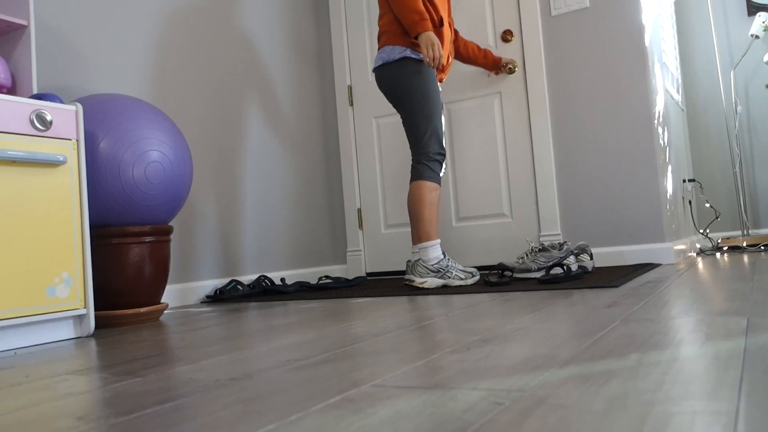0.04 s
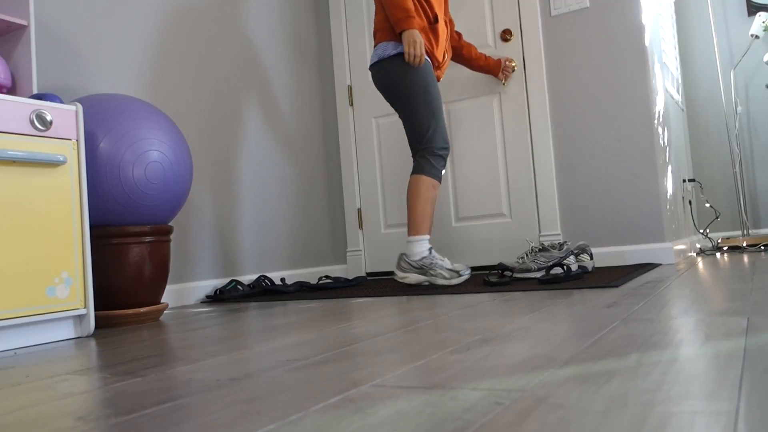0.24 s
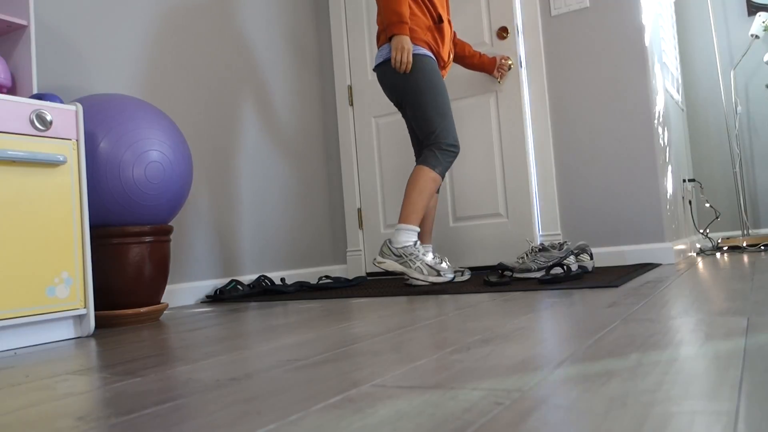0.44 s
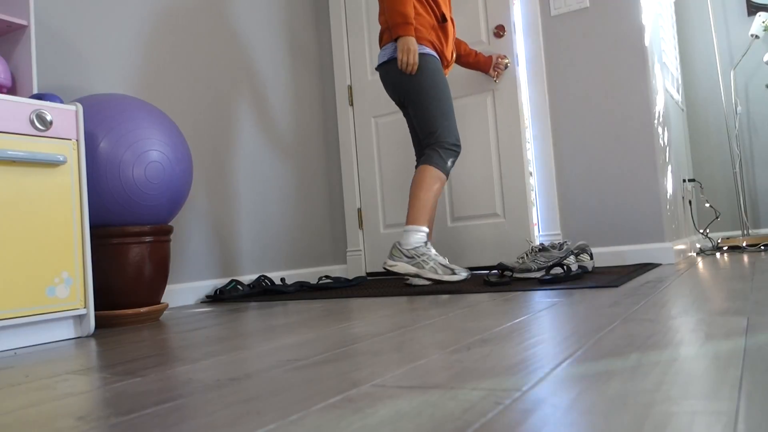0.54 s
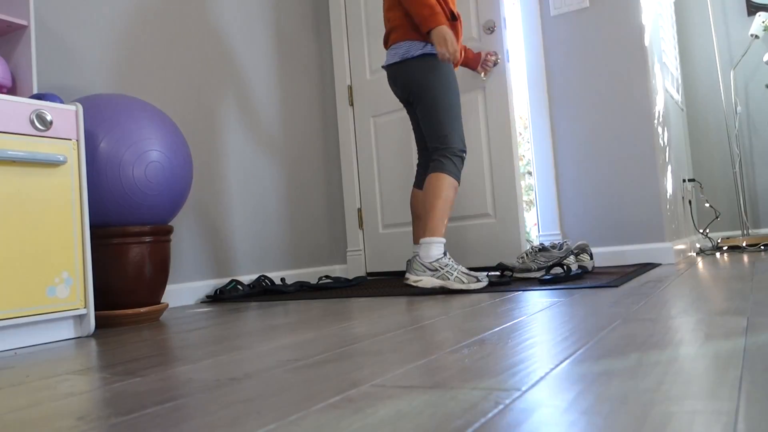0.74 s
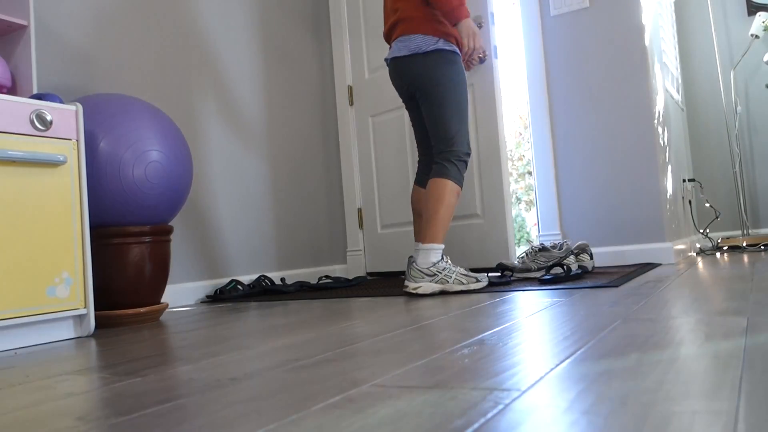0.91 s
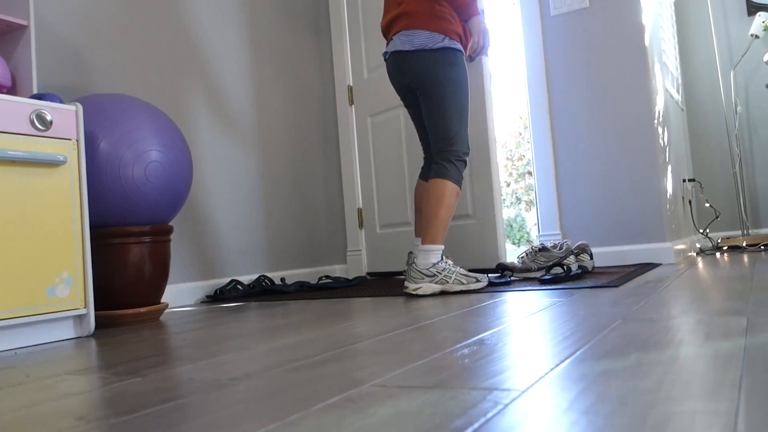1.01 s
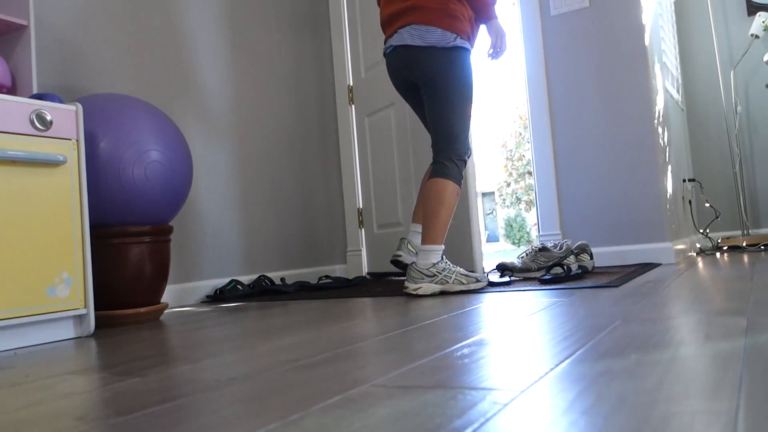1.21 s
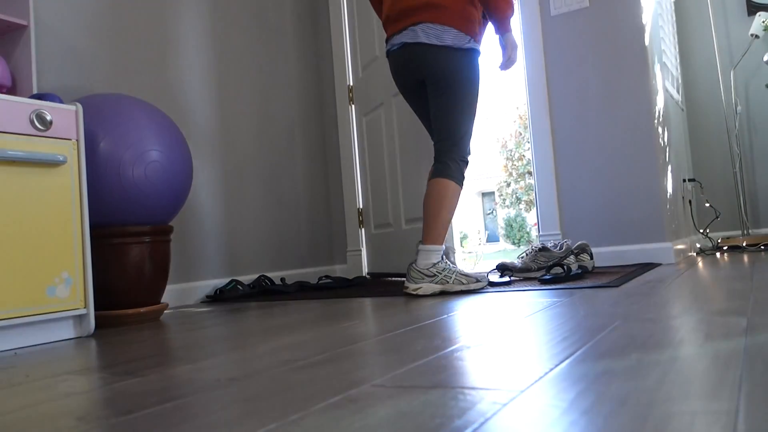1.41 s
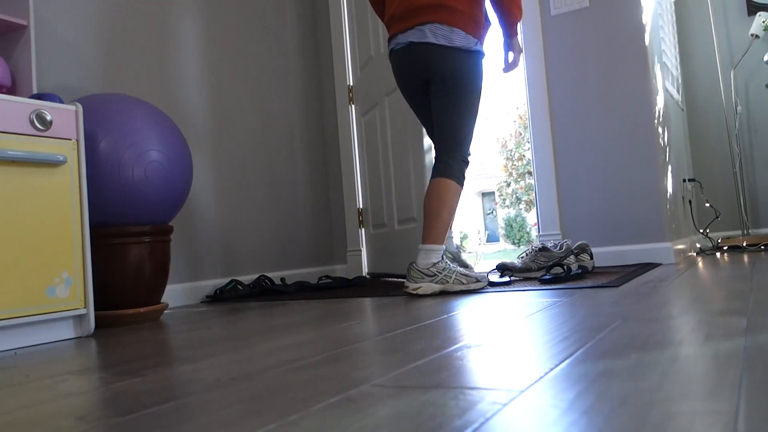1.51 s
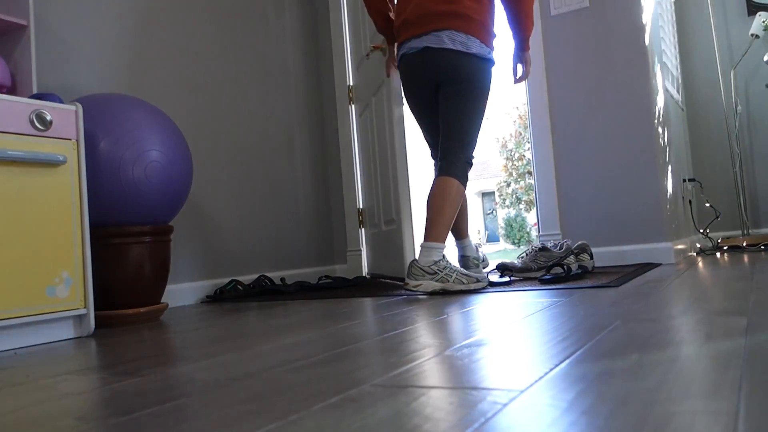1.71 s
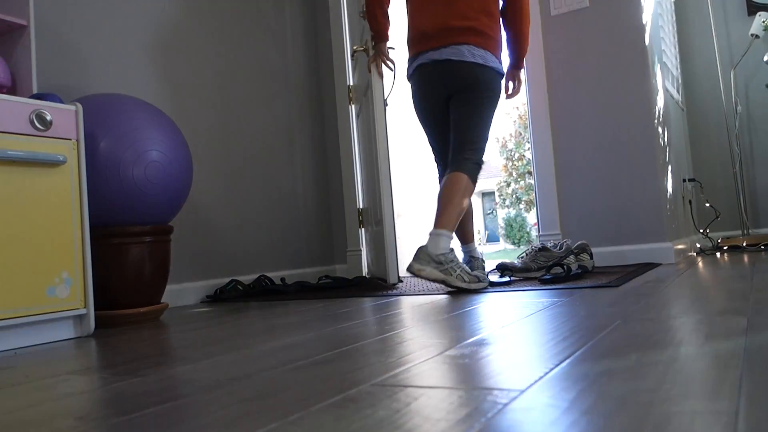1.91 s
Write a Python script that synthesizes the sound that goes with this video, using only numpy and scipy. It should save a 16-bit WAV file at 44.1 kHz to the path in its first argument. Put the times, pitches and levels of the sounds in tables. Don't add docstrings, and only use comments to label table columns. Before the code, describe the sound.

A household front door unlatches with clicks and a sharp knock, its seal peels with a brief hiss, then the hinge creaks from rattle to squeal, heard a few metres away in a bare, hard-floored room.

```python
import sys
import numpy as np
from scipy import signal
from scipy.fft import rfft, irfft
from scipy.io import wavfile
from scipy.ndimage import uniform_filter1d

SR = 44100
rng = np.random.default_rng(int(sys.argv[2]) if len(sys.argv) > 2 else 0)


def decibels_to_gain(level_db):
    exponent = np.asarray(level_db, float) / 20
    return 10 ** exponent


def unload_wav(signal):
    wavfile.write(
        sys.argv[1],
        SR,
        np.round(np.clip(np.atleast_2d(signal).T, -1, 1) * 32767).astype(np.int16),
    )


N = 85995
T = np.arange(N) / SR


def curve(rows, col, edge_s=0):
    r = np.array(rows, float)
    value = np.interp(T, r[:, 0], r[:, col])
    if not edge_s:
        return value
    inside_s = np.minimum(T - r[0, 0], r[-1, 0] - T)
    return np.clip(inside_s / edge_s + 1, 0, 1) * decibels_to_gain(value)


def over_hz(rows, hz):
    r = np.array(rows, float)
    return np.interp(np.log(hz + 1), np.log(r[:, 0]), r[:, 1])


def unit(x):
    return x / np.sqrt(np.mean(x ** 2))


def band(x, hz, width_hz):
    b, a = signal.iirpeak(min(hz, .45 * SR), hz / width_hz, fs=SR)
    return signal.lfilter(b, a, x)


def body(x, rows):
    return sum((-1) ** k * decibels_to_gain(db) * band(x, hz, width_hz) for k, (hz, width_hz, db) in enumerate(rows))


def walk(rate_hz):
    hold = int(SR / rate_hz)
    steps = np.repeat(rng.standard_normal(N // hold + 1), hold)
    return 1.26 * uniform_filter1d(uniform_filter1d(steps, hold), hold)[:N]


def pair(colour):
    # hz, left-right likeness [0-1]
    likeness = [(30, 0.7), (125, .995), (300, 0.98), (500, 0.89), (1000, 0.87), (2000, 0.5), (4000, 0.1),
                (8000, 0)]
    hz = np.arange(N // 2 + 1) * SR / N
    alike = np.clip(over_hz(likeness, hz), 0, 1)
    mid, side = rfft(rng.standard_normal((2, N))) * decibels_to_gain(over_hz(colour, hz))
    mid = mid * np.sqrt(1 + alike)
    side = side * np.sqrt(1 - alike)
    return unit(irfft(np.array([mid + side, mid - side]), N))


def stack(hz, orders, jitter, wobble_db, spread_rad=0):
    phase = 2 * np.pi * np.cumsum(hz * (1 + jitter * walk(150))) / SR
    waver = [walk(45) for _ in range(11)]
    tone = 0
    for k, gain in orders:
        level = gain * decibels_to_gain(wobble_db * waver[int(k) % 11])
        tone = tone + level * np.cos(k * phase + spread_rad * waver[int(k * 3 + 1) % 11])
    return tone * decibels_to_gain(wobble_db / 2 * walk(60.4)), phase


def air():
    # hz, db_per_hz
    air_colour = [(20, -4), (60, -29), (200, -22.5), (650, -6.5), (900, -12.5), (1700, -3), (2600, -11.5),
                  (16000, -16.5)]
    return decibels_to_gain(-63.5) * pair(air_colour) * decibels_to_gain(1.25 * walk(9.48))


def rub():
    # start_s, level_db
    rub_level = [(0, -53), (.13, -59.5), (.2, -40), (.6, -50), (.8, -41), (.9, -53), (.97, -41.5),
                 (1.03, -45), (1.13, -55), (1.17, -40), (1.35, -54.5), (1.55, -76), (1.95, -69)]
    # hz, db_per_hz
    rub_colour = [(60, -45), (150, -26.5), (300, -19), (1100, -2.5), (2200, -7.5), (4000, -13.5),
                  (7000, -23), (15000, -54.5)]
    flicker_db = 1.5
    return pair(rub_colour) * decibels_to_gain(curve(rub_level, 1) + flicker_db * walk(23.8))


def hits():
    # start_s, peak_db, bright_db, length_s
    blows = [(0.002, -45.5, -12, 0.011), (0.019, -47, -19, 0.00093), (0.143, -37.5, -28, 0.0054),
             (0.152, -40, -43, 0.0027), (0.1724, -38.5, 11, 0.0015), (0.178, -32, 8, 0.0009),
             (.187, -44, 12, 0.0011), (0.196, -41, 8, .001), (.2015, -33.5, 15, 0.0025),
             (0.221, -33.5, -6, 0.0027), (0.339, -18, -62, 0.0016), (0.3484, -25, -60, 0.0016),
             (0.350, -18, -57, 0.0026), (0.356, -30, -47, 0.00093), (0.7574, -27, -50, 0.0017),
             (.93, -32.5, -24, .02), (0.97, -27, -40, 0.007), (0.966, -36.5, -25, .02),
             (1.146, -64, 1, .005), (1.1525, -31.5, -2, 0.0096), (1.154, -41, -30, 0.0038),
             (1.156, -35.5, -28, 0.0069), (1.175, -36.5, -10.5, 0.0038), (1.216, -35, -34, 0.0035),
             (1.229, -35, -30, 0.0047), (1.243, -39, -29, 0.0025), (1.284, -41, -35, 0.0059),
             (1.34, -62, -26, 0.0032), (1.736, -57, -9, 0.0078), (1.753, -54.5, -21, 0.0047),
             (1.844, -55.5, -5, 0.027), (1.879, -56, -2, 0.0065), (1.911, -54, -11.5, 0.0067)]
    ring_hz = [870, 3760, 1100, 910, 2540, 3000, 2500, 3000, 1970, 1100, 4130, 3570, 3930, 4000, 2070, 2880,
               1800, 3300, 8630, 3610, 3000, 4080, 1200, 1176, 1305, 1100, 2416, 2000, 2060, 2300, 2040,
               1610, 2080]
    # hz, width_hz, level_db
    panel = [(169, 39, -7), (300, 91, 8.5), (600, 900, -10), (1100, 1100, -16), (1800, 390, 4)]
    out, t = np.zeros(N + 8000), np.arange(8000) / SR
    chance = rng.standard_normal((len(blows), 8000))
    for (start_s, peak_db, bright_db, length_s), hz, noise in zip(blows, ring_hz, chance):
        decay = np.exp(-t / length_s)
        push = noise * decay * (1 - np.exp(-(t / .0013) ** 2))
        crack = noise * np.exp(-t / (0.00076 + 1.5 * length_s))
        ring = push + .7 * np.sin(2 * np.pi * hz * t) * decay * (length_s < .0027)
        for _ in range(2):
            crack = band(crack, 6300, 12000)
        for _ in range(3):
            ring = band(ring, hz, hz / 4)
        panel_share = min(1300 / hz, 1) ** 4
        blow = decibels_to_gain(14.5) * ring + panel_share * body(push, panel) + decibels_to_gain(bright_db) * crack
        first = int(start_s * SR)
        out[first:first + len(t)] += decibels_to_gain(peak_db) * blow / np.abs(blow).max()
    return out[:N]


def groan():
    # start_s, pitch_hz, level_db
    groan_rows = [(.7, 291.4, -73), (.742, 300, -47.5), (.775, 325, -64), (.826, 358.4, -42),
                  (.862, 351, -57), (.902, 347.6, -43), (.95, 300, -63), (1.0, 289.7, -51),
                  (1.12, 295, -53.5), (1.15, 289, -79)]
    # centre_s, pitch_hz, level_db, length_s
    hums = [
        (0.0057, 262.8, -61.5, 0.11),
        (0.56, 215, -59.5, 0.053),
        (0.55, 2340, -36.5, .012),
        (0.9, 1188, -27.5, 0.011),
        (0.89, 2470, -38, 0.026),
        (1.03, 3500, -44.5, .03),
        (1.3, 1600, -37, .014),
        (0.79, 1500, -48, .04),
        (1.113, 590, -50, .026),
    ]
    orders = [(1, 0.8), (2, decibels_to_gain(-18.5))]
    tone = stack(curve(groan_rows, 1), orders, jitter=0.0034, wobble_db=1.0)[0]
    out = decibels_to_gain(3.5) * tone * curve(groan_rows, 2, edge_s=0.037)
    for centre_s, hz, db, length_s in hums:
        out = out + decibels_to_gain(db) * np.cos(2 * np.pi * hz * T) * np.exp(-((T - centre_s) / length_s) ** 2)
    return out


def seal():
    # start_s, centre_hz, level_db
    peel = [(.18, 3300, -66), (.215, 3720, -41.5), (.25, 4170, -37), (.28, 4300, -36.5), (.305, 4324, -34),
            (.322, 4300, -34.5), (.332, 4100, -37), (.345, 4020, -38)]
    # hz, width_hz, level_db
    seal_body = [(1100, 540, -10), (1800, 5100, -54), (236, 280, -20), (3000, 950, -7), (8700, 6500, -28.5)]
    crackle = rng.standard_normal(N) * decibels_to_gain(2.6 * rng.exponential(size=N)) * decibels_to_gain(0.9 * walk(123))
    slow = signal.lfilter(*signal.butter(2, 400 / SR * 2), crackle)
    ring = 2 * slow * np.cos(2 * np.pi * np.cumsum(curve(peel, 1)) / SR)
    hiss = unit(ring + decibels_to_gain(-3) * body(crackle, seal_body))
    return decibels_to_gain(0.5) * hiss * curve(peel, 2, edge_s=0.0042)


def hinge():
    # start_s, slip_hz, level_db, top of slip spectrum [octaves over 1 kHz], pure_lowest_tone_db
    slip_rows = [(.36, 237, -33, 3.9, -80), (.385, 274.8, -29, 3.57, -77), (.42, 335, -29, 3.3, -62.5),
                 (.506, 421.2, -31.5, 3.12, -52), (.582, 511.4, -30.5, 2.23, -49.5),
                 (.62, 622.5, -35, 2.43, -48.5), (.67, 883.3, -33, 2.23, -37), (.7, 1010, -38, 2.9, -49),
                 (.735, 1146, -33.5, 2.24, -36), (.78, 1211, -36, 2.5, -42.5), (.852, 1199, -38, 2.52, -38),
                 (.89, 1096, -33, 1.7, -54), (.925, 992.3, -35.5, 1.38, -46.5),
                 (.965, 877.7, -37, 1, -35.5), (1.03, 859, -42.5, 0.5, -36),
                 (1.07, 922.4, -40, 0.96, -43.5), (1.115, 996.7, -50.5, 1.16, -41.5),
                 (1.155, 1022, -63, 0.49, -42)]
    # hz, width_hz, level_db
    hinge_body = [(870, 121, -1.5), (1250, 410, -1), (1800, 700, 0.5), (2600, 760, 2.5), (3300, 780, -3),
                  (3704, 376, 2), (4300, 320, 0.5), (5226, 410, 2.5), (6320, 230, -15.5), (7430, 2400, -8),
                  (10290, 390, -2.5), (11100, 2100, -7), (14400, 4200, -14), (450, 550, -14.5)]
    # hz, width_hz, level_db
    steel = [(6740, 230, 1), (7150, 300, -9), (9880, 220, -10)]
    grit_db, scrape_db, slip_jitter = -13, 10, .005
    hz = curve(slip_rows, 1)
    top_hz = 1000 * 2 ** curve(slip_rows, 3)
    orders = []
    for k in range(1, 66):
        gain = (k * hz < 16000) * (.6 if 3 < k < 9 else 1)
        orders.append((k, gain / np.sqrt(1 + (k * hz / top_hz) ** 6)))
    jitter = slip_jitter * np.clip(1000 / hz, 0, 2.4) ** 1.2
    slips, phase = stack(hz, orders, jitter, wobble_db=3, spread_rad=1.1)

    noise = decibels_to_gain(grit_db) * rng.standard_normal(N) * (top_hz / 2000) ** 1.5 * 800 / (hz + 200)
    since_slip = np.cos(phase) - 1
    grit = noise * np.exp(2.5 * since_slip)
    scrape = decibels_to_gain(scrape_db) * noise * np.exp(.7 * since_slip) * np.clip(1.25 - hz / 1100, .15, 1)
    rung = body(slips + grit, hinge_body)
    rung = rung + band(scrape, 2790, 1600) - band(scrape, 5140, 2040) + decibels_to_gain(-7.0) * band(scrape, 1600, 940)
    rung = rung + decibels_to_gain(8) * body(slips + 1.6 * grit, steel)
    rung = rung / np.sqrt(uniform_filter1d(rung ** 2, size=3000))
    rattle = decibels_to_gain(-2.0) * rung * curve(slip_rows, 2, edge_s=0.0048)

    pure = sum(decibels_to_gain(db + 2.07 * walk(50.78)) * np.cos(k * phase) for k, db in enumerate([0, -5., -9.], 1))
    return rattle, pure * curve(slip_rows, 4, edge_s=0.0022)


def squeak():
    # start_s, pitch_hz, level_db, overtones_db
    squeal = [(1.185, 1279, -57, 7), (1.225, 1275, -47.5, 7), (1.26, 1292, -46, -1.5),
              (1.305, 1250, -49, 7), (1.345, 1230, -52, 4.5), (1.385, 1224, -52, -13),
              (1.435, 1235, -61, 9), (1.48, 1225, -51.5, -17), (1.5, 1236, -51, -16)]
    # multiple, level_db
    squeal_orders = [(1, 0.5), (2, -0.5), (3, -7.5), (4, -25), (6, -30)]
    over_db = curve(squeal, 3)
    rounding_db = -83 * (T - 1.2575)
    orders = [(k, decibels_to_gain(db + (k > 1) * over_db + (k > 2) * rounding_db)) for k, db in squeal_orders]
    tone = stack(curve(squeal, 1), orders, jitter=0.003, wobble_db=2.0)[0]
    return decibels_to_gain(-2.0) * tone * curve(squeal, 2, edge_s=0.0054)


def room():
    # hz, t60_s
    room_t60 = [(100, 0.67), (500, 0.39), (2000, 0.65), (5000, 0.41), (10000, 0.26), (16000, 0.78)]
    noise, tail = pair([(20, 0), (20000, 0)]), 0
    for hz in 90 * 2 ** np.arange(0, 7.6, .5):
        tail = tail + band(noise, hz, hz / 3) * decibels_to_gain(-60 * T / over_hz(room_t60, hz))
    tail = tail * np.clip((T - .001) / 0.0086, 0, 1)
    return decibels_to_gain(-0.5) * tail / np.sqrt(np.mean(np.sum(tail ** 2, axis=1)))


def scene():
    # start_s, left_minus_right_db
    pan = [(0, -.6), (.35, -2.8), (.6, -1.9), (.85, .3), (1.1, .3), (1.35, 1.7), (1.6, 3.5), (1.8, -2.5)]
    rattle, pure = hinge()
    thin = squeak()
    door = rattle + decibels_to_gain(-8.0) * pure + seal() + hits() + decibels_to_gain(-3.5) * thin
    door = signal.lfilter(*signal.butter(2, 170 / SR * 2, "high"), door)
    wet = signal.fftconvolve(door[None], room(), axes=1)[:, :N]
    direct = decibels_to_gain(-1.0) * door + decibels_to_gain(-8.5) * thin + decibels_to_gain(-1.5) * pure
    pan_db = curve(pan, 1)
    lean = decibels_to_gain(np.array([pan_db, -pan_db]) / 2)
    return (direct + wet + rub()) * lean + decibels_to_gain(-3.0) * groan() + air()


def band_limit(x):
    return signal.sosfilt(signal.butter(12, 16480, fs=SR, output="sos"), x)


def record(dry):
    return band_limit(dry)


dry = scene()
out = record(dry)
unload_wav(out)
```